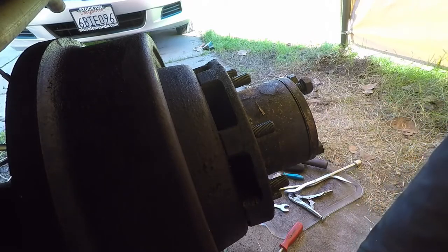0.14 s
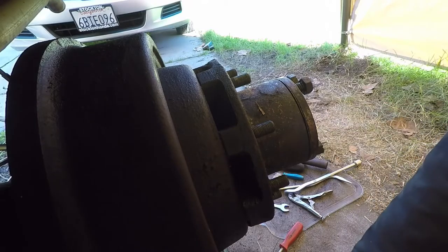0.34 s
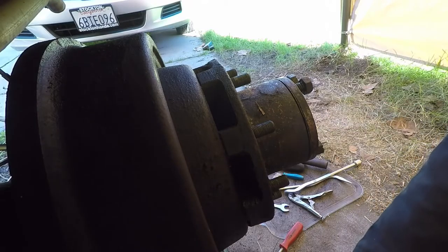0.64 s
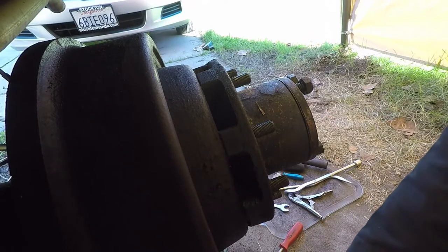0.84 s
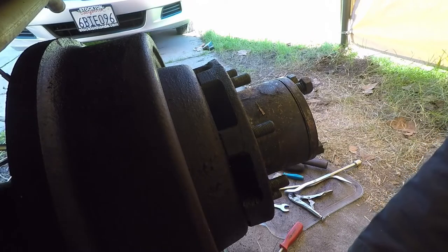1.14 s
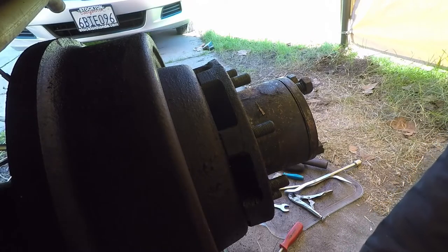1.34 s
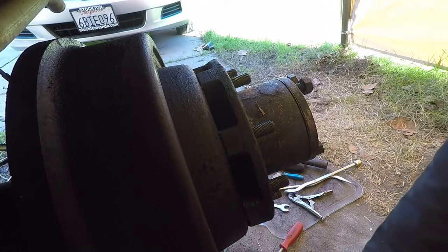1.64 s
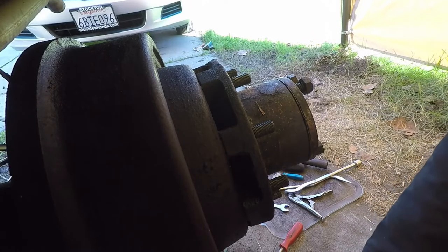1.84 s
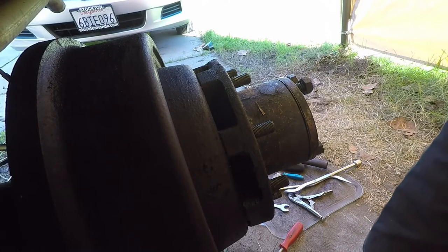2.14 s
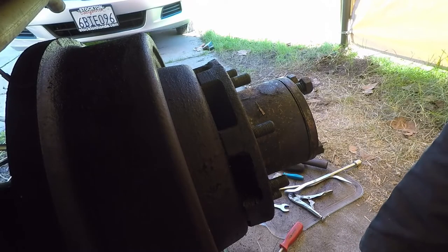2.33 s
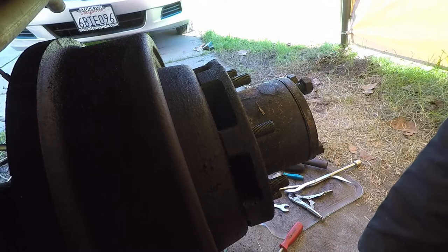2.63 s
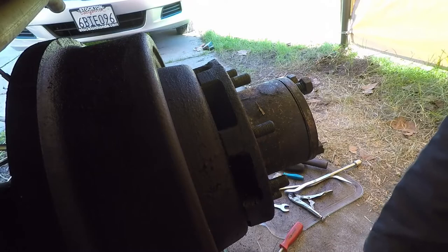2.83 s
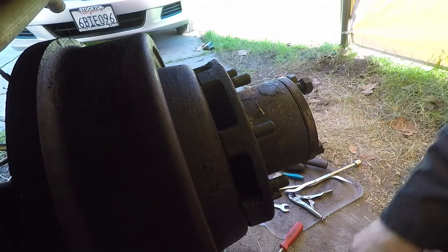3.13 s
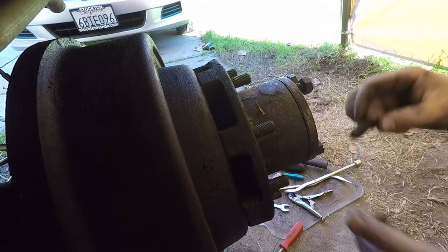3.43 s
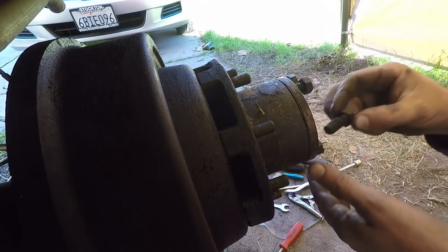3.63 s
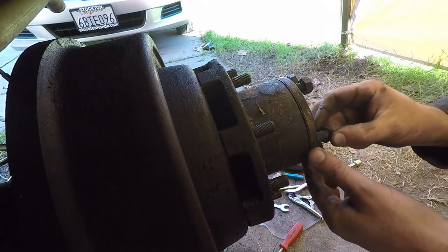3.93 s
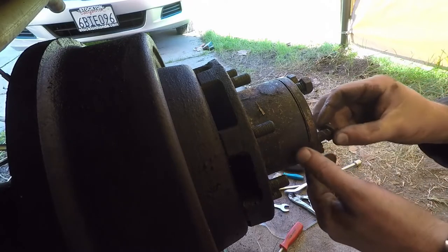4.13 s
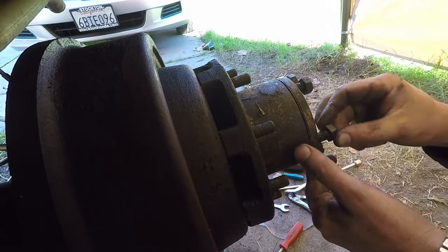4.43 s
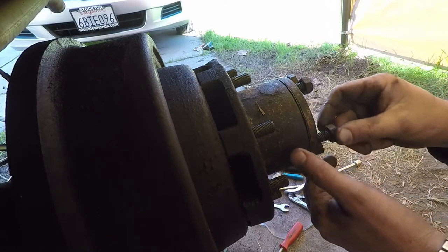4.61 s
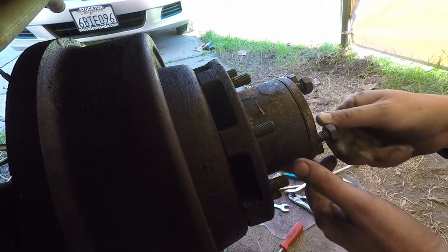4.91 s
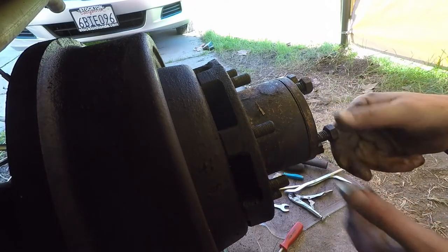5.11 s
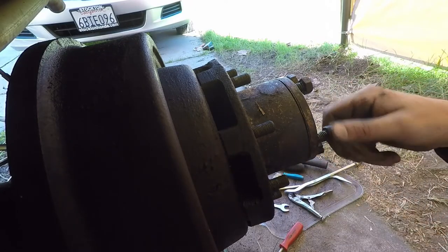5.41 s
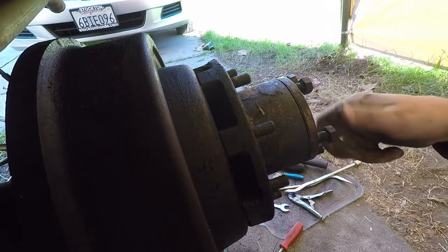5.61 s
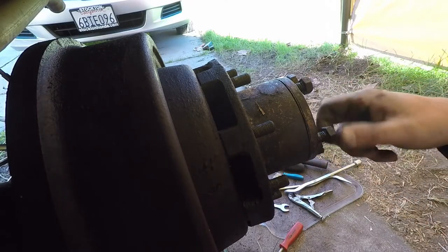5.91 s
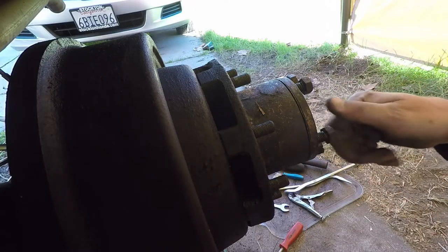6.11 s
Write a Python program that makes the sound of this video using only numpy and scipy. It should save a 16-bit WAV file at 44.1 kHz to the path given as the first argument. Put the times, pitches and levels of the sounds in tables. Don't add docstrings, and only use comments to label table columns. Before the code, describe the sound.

A small microphone under an open shelter hears steady airy hiss, faint low hum and a very weak high whine. Soft touches on a thin metal tray lead to a hard clank at 0.75 s. From 1.1 to 1.4 s come several strong, boxy knocks with a short booming floor, rebounds and rattling nuts; light taps follow, then another hard, barer knock at 2.0 s. Smaller taps and rubs continue to 3.2 s while wind buffets the microphone in deep soft thumps, heaviest from 2.3 to 3.2 s. After that the breeze eases, with smaller puffs near 4.3 and 4.8 s. A stud clinks sharply on the hub at 3.9 s, light touches follow, and the clearest, brightest clink lands at 4.57 s, quickly damped. From 5 s only tiny dry ticks remain, with one distinct click at 5.65 s, over slightly stronger hiss until 6.3 s.

```python
import sys
import numpy as np
from scipy import signal
from scipy.fft import rfft, irfft, next_fast_len
from scipy.io import wavfile
from scipy.ndimage import uniform_filter1d, map_coordinates

SR = 44100
rng = np.random.default_rng(int(sys.argv[2]) if len(sys.argv) > 2 else 0)


def gain_from_db(level_db):
    decades = np.asarray(level_db, float) / 20
    return 10 ** decades


def to_wav(s):
    ch = np.atleast_2d(s).T
    pcm = np.round(np.clip(ch, -1, 1) * 32767)
    wavfile.write(sys.argv[1], SR, pcm.astype(np.int16))


N = 276066


def unit(x):
    return x / np.sqrt(np.mean(x ** 2) + 1e-20)


def peaked(x, db):
    return x * gain_from_db(db) / np.max(np.abs(x))


def add(track, s, x):
    track[round(s * SR):][:len(x)] += x


def curves(rows):
    s, *cols = np.transpose(rows)
    return [np.interp(np.arange(N) / SR, s, c) for c in cols]


def wobble(rate):
    knots = rng.standard_normal(int(N * rate / SR) + 4)
    return map_coordinates(knots, [np.arange(N) * rate / SR])


def gains(points, size):
    f, db = np.transpose(points)
    grid = np.fft.rfftfreq(size, 1 / SR)
    return gain_from_db(np.interp(np.log(grid + 1), np.log(f + 1), db))


def noise(points):
    m = next_fast_len(N + 8192)
    spectrum = rfft(rng.standard_normal(m)) * gains(points, m)
    return unit(irfft(spectrum, m)[:N])


def below(x, top_hz):
    return irfft(rfft(x) * (np.fft.rfftfreq(N, 1 / SR) < top_hz), N)


def causal(points, size=2048):
    cep = irfft(np.log(gains(points, size) + 1e-6), size)
    cep[1:size // 2] *= 2
    cep[size // 2 + 1:] = 0
    return irfft(np.exp(rfft(cep)), size)[:size // 2]


def through(x, response):
    return signal.fftconvolve(x, response)[:len(x)]


def ring(modes, t, spread_db, damp=1.0, detune=.002, blur_hz=0):
    hz, db, t60 = np.transpose(modes)[:, :, None]
    luck = rng.standard_normal((2, len(modes), 1))
    sign = (-1.0) ** np.arange(len(modes))[:, None]
    steps = rng.standard_normal((len(modes), len(t) // 32 + 1))
    steps = np.repeat(steps, 32, axis=1)[:, :len(t)]
    wander = np.cumsum(steps, axis=1) * np.sqrt(2 * np.pi * blur_hz / SR / 32)
    decay = gain_from_db(db + spread_db * luck[0] - 60 * t / (t60 * damp))
    tone = np.sin(2 * np.pi * hz * (1 + detune * luck[1]) * t + wander)
    return np.sum(sign * decay * tone, 0)


# start_s, hiss_db, hum_db
AIR_LEVEL = [(0, -55, -54.5), (1.5, -54.5, -55), (3, -54.5, -55), (4.5, -52.5, -55), (5.3, -51, -55.5),
             (5.6, -51.5, -53), (6.26, -51.5, -55.5)]
# freq_hz, density_db
HISS_COLOUR = [(900, -31), (1500, -51), (2100, -14.5), (2500, -8.5), (3400, -6.5), (4500, -3), (5300, 1),
               (5900, 3), (6600, -3.5), (7530, -11.5), (9000, -17), (11000, -21.5), (13300, -23),
               (15300, -21.5)]
# freq_hz, density_db
HUM_COLOUR = [(71, -8.5), (120, -1.5), (242, -12.5), (362, -5), (415, -11), (489, -8.5), (767, -15),
              (914, -15.5), (2400, -28.5), (3120, -25), (5280, -120)]


def air():
    hiss_db, hum_db = curves(AIR_LEVEL)
    whine_hz, whine_db = 8690, -74.5
    whine = gain_from_db(whine_db + 0.75 * wobble(20)) * np.sin(2 * np.pi * whine_hz * np.arange(N) / SR)
    shimmer_db, sway_db = .6 * wobble(8), 1.2 * wobble(6)
    hiss = gain_from_db(hiss_db + 0.5 + shimmer_db) * below(noise(HISS_COLOUR), 15300)
    hum = gain_from_db(hum_db + 3 + sway_db) * noise(HUM_COLOUR)
    return hiss + hum + whine


# peak_s, buffet_db, half_length_s, flutter_db re buffet
GUST_SWELLS = [(0.007, -53, 0.015, 5), (0.178, -37.5, 0.029, -3), (0.254, -28.5, 0.0094, 0),
               (0.699, -29.5, 0.021, -14), (0.82, -29, 0.016, -30), (0.897, -25.5, 0.066, -13),
               (1.148, -41.5, 0.072, -3), (1.99, -41.5, 0.067, -10), (2.12, -36, 0.051, -9),
               (2.297, -27.5, 0.023, -12), (2.382, -24, 0.032, -1.5), (2.475, -31, 0.016, -10),
               (2.61, -27, 0.026, -5), (2.8, -35, 0.021, 0), (2.872, -23, 0.035, -25),
               (2.984, -22.5, 0.035, 0), (3.05, -20.5, 0.047, -15), (3.168, -31, 0.026, -2.5),
               (3.268, -26.5, 0.0089, -30), (3.337, -29, 0.016, -4), (3.673, -42.5, 0.022, 3),
               (3.99, -27.5, 0.018, -27), (4.31, -32.5, 0.032, -14), (4.52, -36.5, 0.094, -3),
               (4.767, -36, 0.096, -12), (5.304, -41.5, 0.071, -3.5)]
# start_s, level_db
CALM_BREEZE = [(0, -41.5), (1.2, -47.5), (1.6, -46), (2.2, -50.5), (3, -33), (3.5, -45.5), (4.6, -44.5),
               (5.1, -43), (6.26, -48)]


def gusts():
    s, db, half, flutter_db = np.transpose(GUST_SWELLS)[:, :, None]
    step = np.arange(0, N + 64, 64) / SR
    swell = gain_from_db(db) * np.exp(-.5 * ((step - s) / np.clip(half, .01, .2)) ** 2)
    calm = gain_from_db(np.interp(step, *np.transpose(CALM_BREEZE)))

    def total(each, rest):
        return np.interp(np.arange(N) / SR, step, np.sqrt(np.sum(each ** 2, 0) + rest ** 2))

    return total(swell, calm), total(swell * gain_from_db(flutter_db), calm * gain_from_db(-3))


# freq_hz, density_db
BUFFET_COLOUR = [(15, -9), (30, 1), (60, 1.5), (100, 0), (130, -19.5), (200, -74), (400, -120)]
# freq_hz, density_db
FLUTTER_COLOUR = [(60, -15.5), (110, -1.5), (170, -7), (260, -17), (400, -25.5), (800, -59), (1600, -120)]
# start_s, peak_db, pitch_hz (negative where suction comes first)
PORT_PUFFS = [(0.174, -16.5, 107), (0.2512, -38, 67), (0.697, -40, 71), (2.094, -29, 79.5), (2.333, -9, 79),
              (2.341, -13.5, 167), (2.361, -20, 105), (2.385, -15.5, 110), (2.482, -9.5, 116),
              (2.574, -21.5, 85), (2.602, -17, 78), (2.643, -27, 146), (2.795, -15.5, 80), (2.81, -14, 81),
              (2.851, -34, 101), (2.976, -15, 85), (2.991, -12, 78), (3.013, -16.5, -100),
              (3.047, -12, -77), (3.11, -24, 108), (3.169, -13.5, 89), (4.294, -25.5, 87),
              (4.7481, -23.5, 108), (4.811, -26.5, 121)]


def wind():
    buffet_gain, flutter_gain = gusts()
    lumps_db = 3 * wobble(24.91)
    buffet = buffet_gain * unit(gain_from_db(lumps_db) * noise(BUFFET_COLOUR))
    flutter = flutter_gain * unit(gain_from_db(lumps_db + 3.5 * wobble(40)) * noise(FLUTTER_COLOUR))
    out = np.pad(buffet + flutter, (0, SR))
    t = np.arange(SR // 20) / SR
    for s, db, hz in PORT_PUFFS:
        turn = hz * 1.3 * (t - .013)
        puff = -np.sin(2 * np.pi * turn) * np.exp(-(turn / .45) ** 2)
        add(out, s, peaked(puff, db - 2.5))
    return out[:N]


# freq_hz, level_db, t60_s
FLOOR_MODES = [(291, -20, 0.12), (518, -11, 0.2), (632, -15, .07)]
# freq_hz, level_db, t60_s
KNOCK_MODES = [(332, 5.5, 0.027), (419, 9.5, 0.034), (510, 3.5, 0.017)]
# start_s, pitch_hz, t60_s
FLOOR_GRIP = [(0, 452, .2), (.8, 452, .2), (1.03, 410, .15), (1.09, 404, .14), (1.104, 522, .16),
              (1.152, 412, .07), (1.166, 368, .2), (1.3, 361, .15), (1.329, 409, .17), (1.4, 409, .09),
              (1.7, 444, .15), (1.99, 500, .17), (2.14, 447, .15), (2.33, 408, .12), (2.52, 408, .12),
              (2.7, 394, .16), (3.13, 392, .12), (3.18, 440, .13)]


def floor_boom(s, boom_peak_db, length, t):
    when, *floor = np.transpose(FLOOR_GRIP)
    floor_hz, floor_t60 = (np.interp(s, when, c) for c in floor)
    knock_db = 0.91 * min(boom_peak_db + 4.5, 0)
    knock = [(hz, level + knock_db, t60) for hz, level, t60 in KNOCK_MODES]
    modes = FLOOR_MODES + knock + [(floor_hz, 0, floor_t60)]
    swing = ring(modes, t, spread_db=-3.0, damp=.75) * (1 - np.exp(-t / (0.25 * length)))
    boom_band = signal.butter(2, [240, 680], "band", fs=SR, output="sos")
    return peaked(signal.sosfilt(boom_band, swing), boom_peak_db)


# freq_hz, gain_db
PORT_COLOUR = [(300, -40), (600, -9.5), (1000, 2), (2100, -4.5), (3500, -1.5), (5800, 5.5), (7200, -7),
               (9000, -14), (12000, -23.5), (16000, -35)]


def nut_rattle(grip, t, port):
    settle = grip / np.max(grip) + gain_from_db(-12.0 - 60 * t / 0.29) * (1 - np.exp(-t / 0.0019))
    clumps = gain_from_db(4 * np.repeat(rng.standard_normal(len(t) // 60), 60))
    return through(rng.standard_normal(len(t)) * clumps * settle, port)


# freq_hz, level_db, t60_s
LID_MODES = [(627, -18, 0.37), (950, -6.5, 0.07), (1350, 4, 0.023), (1454, 1, 0.13), (2605, -10, 0.064),
             (2929, -15, 0.1), (3210, -14, 0.14), (4010, -11.5, 0.091), (5000, -5, 0.034),
             (5180, -4.5, 0.039), (5760, -0.5, 0.029), (6130, -12, 0.04), (6340, -20, 0.073),
             (7000, -14, 0.07)]
RIM_MODES = [(501, -13.5, 0.06), (630, -21, 0.15), (1035, -4.5, 0.1), (1274, 3, 0.033), (1430, -1.5, 0.026),
             (1740, -11.5, 0.057), (2445, -1.5, 0.069), (3040, -2.5, 0.094), (3820, -11.5, 0.085),
             (4710, -8, 0.067), (5740, -2.5, 0.1), (6800, -28, .05)]
WALL_MODES = [(980, -18, 0.082), (1044, 2, 0.14), (1088, -3.5, 0.12), (1189, 2.5, 0.087),
              (1436, -11, 0.055), (1607, -4.5, 0.12), (1960, -11, 0.06), (3003, -11, 0.096),
              (3720, -8.5, 0.064), (4570, -34, 0.051), (5040, -12, 0.11), (5850, -18, .09),
              (6240, 0, 0.035), (6600, -11, 0.07)]
CORNER_MODES = [(944, -10, 0.068), (1055, -5, 0.14), (1208, 6.5, 0.064), (1490, -12, 0.12),
                (1590, -8, 0.15), (3050, -11, 0.13), (3450, -16, 0.11), (3810, -3, 0.045),
                (4220, -15, 0.15), (5000, 5, 0.028), (5540, -13, 0.14), (5800, -22, 0.13),
                (6400, -8, 0.036), (6500, -16, 0.05)]
EDGE_MODES = [(993, -8, 0.14), (1041, 1.5, 0.12), (1310, -0.5, 0.039), (1515, -8, 0.083), (1683, -3, 0.06),
              (3010, -13, 0.12), (3480, -16, .09), (3690, -5, 0.041), (4370, -17, 0.1), (5070, 3, 0.038),
              (5500, -13, 0.13), (5880, -16, 0.1), (6120, -1, 0.032), (6400, -18, 0.05)]
DIVIDER_MODES = [(655, -5, 0.14), (939, -9.5, 0.17), (1460, -10, 0.086), (1954, -2.5, 0.17),
                 (3035, -6, 0.15), (3240, -8, 0.077), (3650, -13, 0.045), (4460, -19, .05),
                 (5410, 2.5, 0.037), (5800, 3, 0.042), (5900, 4.5, 0.054), (6150, -16, .05)]
BIN_MODES = [(604, -8, 0.19), (927, -10.5, 0.16), (1448, -8, 0.12), (1935, 1.5, 0.091), (3065, -6, 0.046),
             (3410, -9, 0.083), (4000, -16, .05), (4500, -12, 0.055), (5330, 1.5, 0.059),
             (5715, 5.5, 0.055), (5740, 3.5, 0.12), (5960, -2, .06), (7960, -10, 0.033)]
WASHER_MODES = [(3060, 0, 0.058)]
# start_s, ring_peak_db, boom_db re ring, rattle_db re ring, brightness_db
LID_KNOCKS = [
    (0.513, -45, 3.5, -2, 1),
    (0.7586, -14.5, -13, -6, 2.5),
]
RIM_KNOCKS = [
    (0.347, -41.5, 1.5, -16, -11),
    (0.401, -32, -3.5, -13, -11),
    (0.734, -43.5, -7, -15, -7),
    (1.726, -43, 1, 0, -17),
    (1.991, -15.5, -48, -10.5, -5),
]
WALL_KNOCKS = [
    (1.143, -32.5, -2, 1, -8),
    (1.152, -11, 6.5, -0.5, 1.5),
    (1.166, -21, -12, -7, -5),
    (1.178, -26, 6.5, -19, 8),
]
CORNER_KNOCKS = [
    (1.2368, -13.5, 6.8, -10, 0),
]
EDGE_KNOCKS = [
    (1.329, -15.5, 2, -7.5, 3),
    (1.364, -25, 3, -11, 1),
]
DIVIDER_KNOCKS = [(2.335, -38, -7, -15, -19), (2.343, -33, 4.5, 3, 2), (2.351, -39, 7.5, -14, 0),
                  (2.39, -27.5, -4.5, -5, 0), (2.474, -47.5, 3, 10.5, 2), (2.498, -25.5, -4.5, -4, 6.5),
                  (2.512, -38, -15, -2, -3), (2.701, -40, -1, -3, 8), (2.714, -34.5, -19, 0, -8),
                  (2.719, -36.5, 13, 2, 5), (2.729, -37.5, -19, 0.5, 2)]
BIN_KNOCKS = [(0.043, -46, -6, -10, -20), (0.985, -43.5, 6, 1, -2), (1.089, -19, -1, -5, -5),
              (1.298, -32.5, 7, 1, -3), (1.759, -56, 20.5, -7, 0), (1.814, -54, 14.5, -8, 2),
              (2.142, -47, 6.5, 4, -1), (3.161, -35.5, 0, -20, 10), (3.182, -32, 2, -3, -6),
              (3.213, -27.5, 0, -19, -0.5)]
BIN_RUBS = [(0.472, -50.5, 6, 11, 2), (0.494, -56.5, 10, 16, 2), (1.026, -32.5, -14, 2, -1),
            (1.036, -37, 0, -3, -11), (1.735, -51, 8, -2, 2), (1.803, -58.5, -6, 20, 0),
            (3.004, -39, -21, 3, 4), (3.036, -39.5, -28, -3, 4), (3.112, -43, -3, -12, 5),
            (3.127, -40.5, 3.5, -19, -10), (3.167, -38, 2, -7, 3.5), (3.222, -41, 2, 1, -13)]
WASHER_KNOCKS = [(1.838, -51, -10, -11, 0), (1.862, -51, -15, -12, 0), (1.886, -56, 6, -14, 0),
                 (1.935, -52, 4, -14, 0)]
EDGE_TOUCHES = [(0.772, -28.5, -10, -5, 9), (1.104, -36.5, 11, -6, -3), (1.193, -30, 11, -12, -3),
                (1.381, -39.5, -8, -10, -4), (2.003, -28, -10, -9, -8)]


def tray():
    out, t, port = np.zeros(N + SR), np.arange(SR // 5) / SR, causal(PORT_COLOUR)
    contacts = (  # modes, contacts, contact length in s
        (LID_MODES, LID_KNOCKS, 0.0082),
        (RIM_MODES, RIM_KNOCKS, 0.0051),
        (WALL_MODES, WALL_KNOCKS, 0.0046),
        (CORNER_MODES, CORNER_KNOCKS, 0.0046),
        (EDGE_MODES, EDGE_KNOCKS, 0.0046),
        (DIVIDER_MODES, DIVIDER_KNOCKS, 0.0058),
        (BIN_MODES, BIN_KNOCKS, 0.0058),
        (BIN_MODES, BIN_RUBS, 0.014),
        (WASHER_MODES, WASHER_KNOCKS, 0.0037),
        (EDGE_MODES, EDGE_TOUCHES, 0.0046))
    for part, hits, length in contacts:
        grip = np.exp(-t / length) * (1 - np.exp(-t / (1.2 * length)))
        for s, db, boom_db, rattle_db, bright_db in hits:
            struck = [(hz, level + bright_db * (hz > 2300), t60) for hz, level, t60 in part]
            force = rng.standard_normal(len(t)) * grip / np.linalg.norm(grip)
            force[0] = 3.66 * 0.003 / length
            body = ring(struck, t, spread_db=1, damp=.85, detune=.003, blur_hz=22)
            add(out, s, peaked(through(force, body), db))
            add(out, s, peaked(nut_rattle(grip, t, port), db + rattle_db + 1.0))
            add(out, s, floor_boom(s, db + boom_db, length, t))
    return out[:N]


# start_s, peak_db, treble_db re peak, length_s
DRY_TICKS = [(0.182, -46, -17, .004), (0.488, -37.5, -11, 0.0067), (3.674, -36, -29, 0.0058),
             (3.689, -36.5, -19, 0.0015), (3.923, -39, -8, 0.00088), (4.203, -41, -5, 0.0022),
             (4.132, -56, 8, 0.0069), (4.506, -29, -20, 0.0012), (4.51, -40, -1, 0.0015),
             (4.599, -41, 4, 0.0012), (4.743, -43, -13, .001), (5.004, -43.5, 3, 0.015),
             (5.012, -43.5, 11, 0.0013), (5.6555, -21.5, -5.5, 0.00086), (5.66, -35, -9, 0.0089),
             (5.935, -40.5, -11, 0.015), (5.222, -51, 4, .0006), (6.208, -44, -4, 0.0031)]


def ticks():
    out, t, port = np.zeros(N + SR), np.arange(SR // 10) / SR, causal(PORT_COLOUR)
    bright = causal([(3000, -69), (8000, 4.0), (11000, -3), (16000, -13)])
    for s, db, treble_db, length in DRY_TICKS:
        burst = rng.standard_normal(len(t)) * np.exp(-t / np.clip(length, .0004, .02))
        burst[0] = 0.53
        add(out, s, peaked(through(burst, port), db))
        add(out, s, peaked(through(burst, bright), db + treble_db))
    return out[:N]


# start_s, peak_db, length_s
EDGE_SPARKS = [(0.754, -56, .003), (1.085, -45, .002), (1.141, -40, 0.0037), (1.98, -60, 0.0022),
               (2.34, -52, .004), (2.391, -44, .002), (2.49, -45, .003), (2.714, -47, .006),
               (3.013, -54, 0.017), (3.166, -51, .002), (3.181, -48, .002), (3.211, -43, 0.0029),
               (3.222, -49, .002), (4.2, -54, .001)]
# freq_hz, gain_db
SPARK_COLOUR = [(5000, -55), (8000, 1), (11000, 6), (14500, -1), (16500, -10)]


def sparks():
    out, t, colour = np.zeros(N + SR), np.arange(SR // 10) / SR, causal(SPARK_COLOUR)
    for s, db, length in EDGE_SPARKS:
        burst = rng.standard_normal(len(t)) * np.exp(-t / np.clip(length, .0005, .02))
        add(out, s, peaked(through(burst, colour), db))
    return out[:N]


# start_s, peak_db, low_mode_db, top_mode_db, grip (0-1)
STUD_CLINKS = [(3.9148, -12.5, -30, -7.5, 0.85), (4.1208, -42.5, -9, -8, 0.8), (4.1241, -35, -9, -9, 0.7),
               (4.128, -40, -13, -10, 0.85), (4.1412, -40.5, -13, -5, 0.3), (4.2048, -32, -9, -13, 0.95),
               (4.354, -47, -1, -11, 1), (4.368, -44.5, -9, -4, 0.8), (4.434, -49, -28, -10, 0.5),
               (4.5078, -26, -5.5, -1, 0.7), (4.5117, -30, -9, -6, 0.9), (4.562, -29.5, -17, -2, 0.1),
               (4.5704, -11, -16.5, -8.5, 0.4), (4.577, -24, -18, -8, 1)]
# freq_hz, level_db, t60_s
STUD_MODES = [(2772, 0, .085), (5268, 0, .14), (6056, 0, .058), (7036, 0, .075)]
# freq_hz, level_db, t60_s
NUT_MODES = [(3300, -19, .035), (3580, -26, .055), (3768, -25, .05), (4440, -20, .045), (5860, -14, .035),
             (6170, -11, .04), (9300, -26, .03), (13310, -46, .04)]
# freq_hz, gain_db
CRACK_COLOUR = [(600, -14), (1200, -12), (2000, -9.5), (2800, 5), (4500, 6), (6000, 21), (7500, -56),
                (9200, -4), (12000, -41), (16000, -64)]


def stud():
    out, t, colour = np.zeros(N + SR), np.arange(SR // 4) / SR, causal(CRACK_COLOUR)
    for s, db, low_db, top_db, grip in STUD_CLINKS:
        second_db = -3 + 0.36 * low_db
        levels = (low_db, second_db, 0, top_db)
        struck = [(hz, level + rel, t60) for (hz, level, t60), rel in zip(STUD_MODES, levels)]
        tone = ring(struck, t, spread_db=0, detune=0, blur_hz=1.5, damp=np.clip(1.5 - grip, .3, 2))
        tone = tone + ring(NUT_MODES, t, spread_db=2.5)
        burst = rng.standard_normal(len(t)) * gain_from_db(-60 * t / 0.02)
        crack = peaked(through(burst, colour), 0.89)
        add(out, s, gain_from_db(db) * (tone * (1 - np.exp(-t / 0.00012)) + crack))
    return out[:N]


def shelter(x):
    t = np.arange(SR // 4) / SR
    tail = rng.standard_normal(len(t)) * gain_from_db(-60 * t / 0.21) * (t > .004)
    return through(x, tail / np.linalg.norm(tail))


# freq_hz, density_db
APART_COLOUR = [(30, -16), (200, -1.5), (1200, -14), (2200, -19), (5800, -6.5), (8000, -15), (14800, -16),
                (15500, -37)]
# freq_hz, share_of_time (0-1)
SHARED_TIME = [(100, 0.83), (500, .42), (1600, 0.57), (3500, 0.55), (6000, 0.38), (9000, .2), (11000, .15),
               (14000, .27)]


def mismatch(mid):
    trace = gain_from_db(-36) * (np.diff(mid, prepend=0) + 1.1 * mid) * wobble(300)
    leak = trace + gain_from_db(-70.5) * noise(APART_COLOUR)
    hz, t, z = signal.stft(leak, SR, nperseg=2048)
    patches = uniform_filter1d(rng.standard_normal((40, len(t))), 3, 0)
    field = unit(patches + 0.28 * rng.standard_normal(len(t)))
    field = unit(uniform_filter1d(field, size=2, axis=1))
    band = (39 * (hz / hz[-1]) ** .7).astype(int)
    chance = 1 / (1 + np.exp(-1.7 * field[band]))
    f, share = np.transpose(SHARED_TIME)
    is_open = chance > np.interp(hz, f, share)[:, None]
    return signal.istft(z * is_open, SR, nperseg=2048)[1][:N]


def scene():
    far, near = tray(), ticks() + sparks() + stud()
    metal = far + near + shelter(gain_from_db(-16) * far + gain_from_db(-23) * near)
    breeze = wind()
    side = mismatch(metal + gain_from_db(-6.0) * breeze)
    mid = metal + breeze + air()
    return np.array([mid + side, mid - side])


def roll_off(x):
    return signal.sosfilt(signal.butter(12, 16450, fs=SR, output="sos"), x)


def record(dry):
    mix = below(dry, 15900)
    return roll_off(mix)


dry = scene()
out = record(dry)
to_wav(out)
```